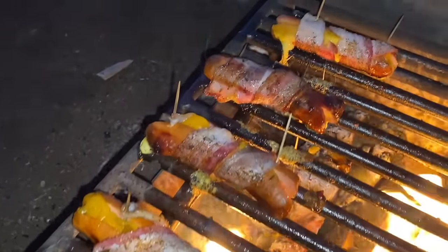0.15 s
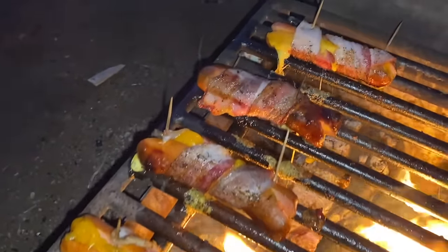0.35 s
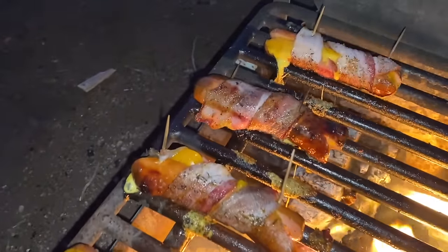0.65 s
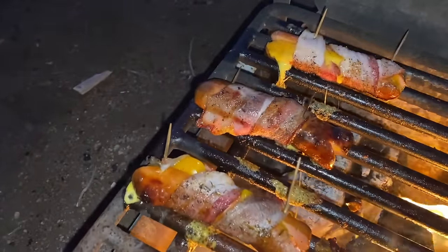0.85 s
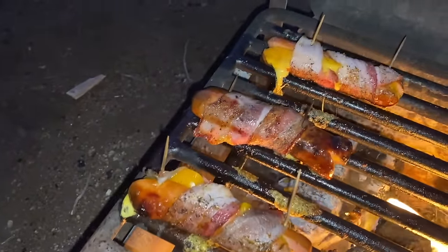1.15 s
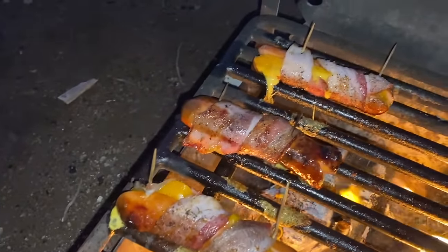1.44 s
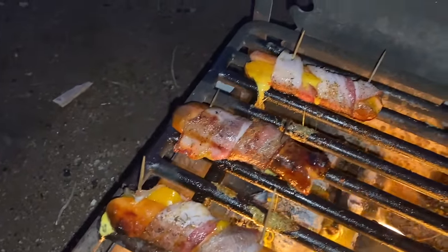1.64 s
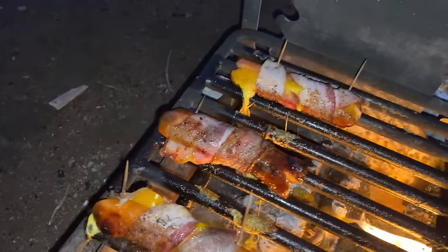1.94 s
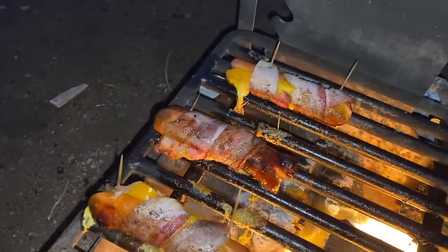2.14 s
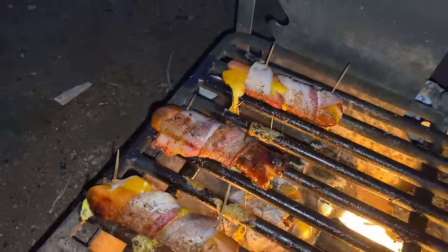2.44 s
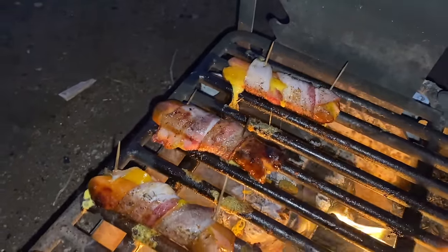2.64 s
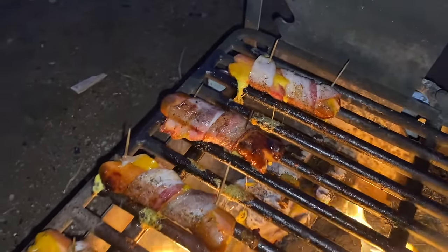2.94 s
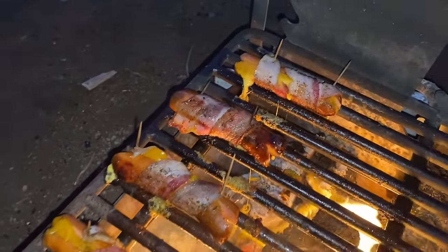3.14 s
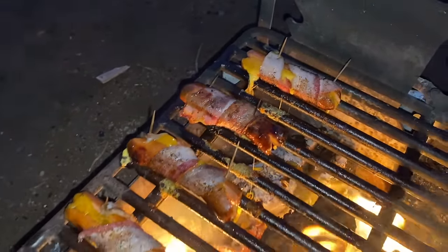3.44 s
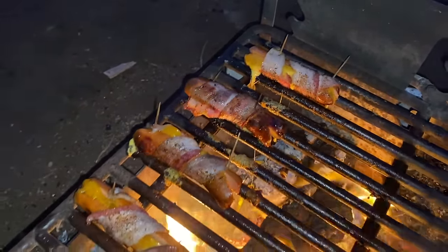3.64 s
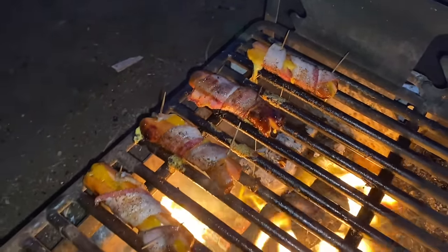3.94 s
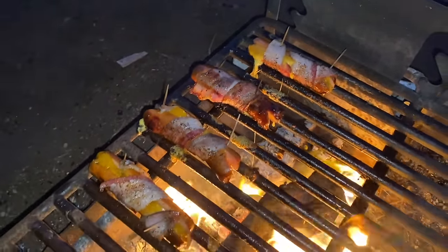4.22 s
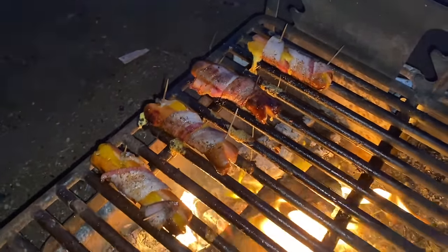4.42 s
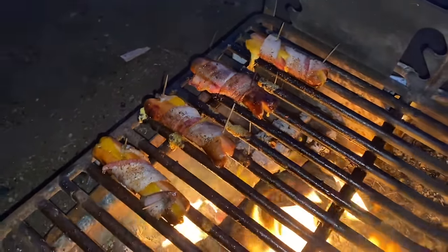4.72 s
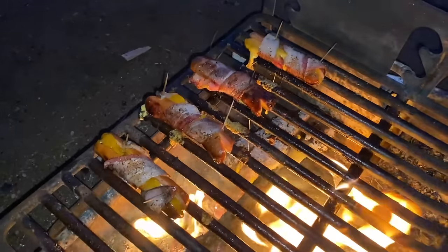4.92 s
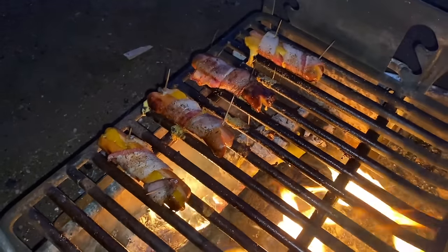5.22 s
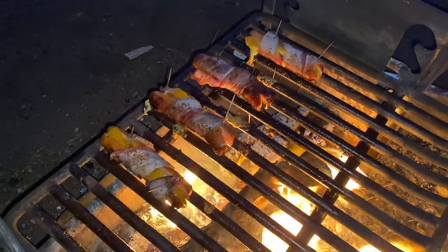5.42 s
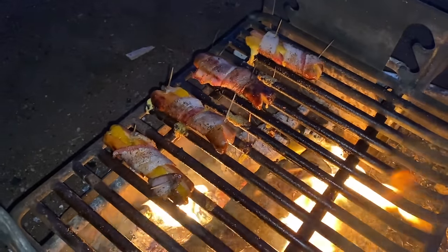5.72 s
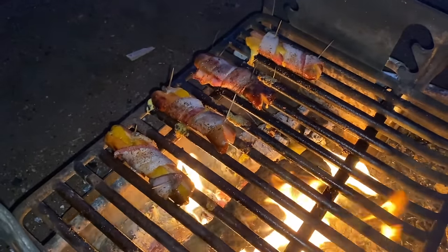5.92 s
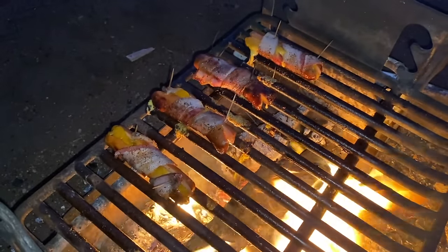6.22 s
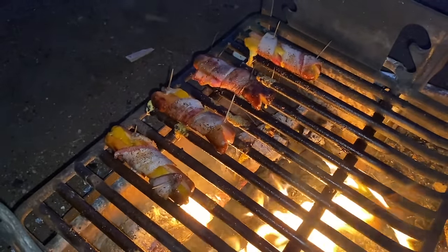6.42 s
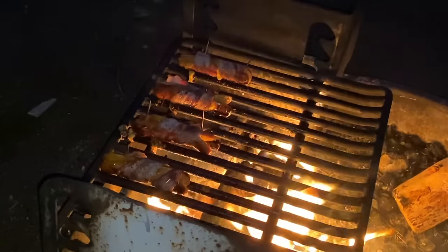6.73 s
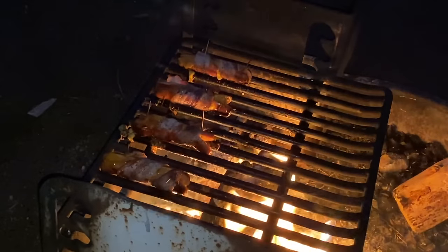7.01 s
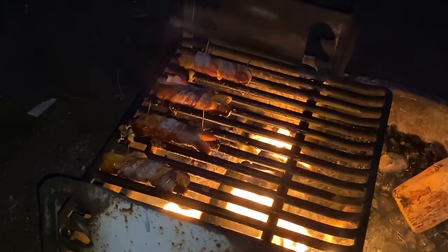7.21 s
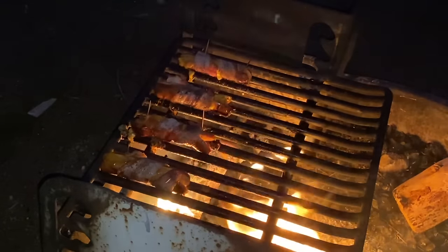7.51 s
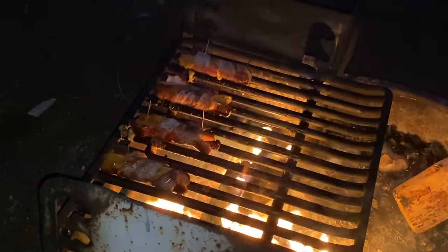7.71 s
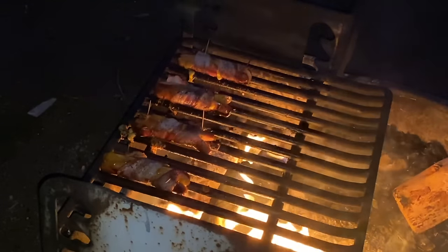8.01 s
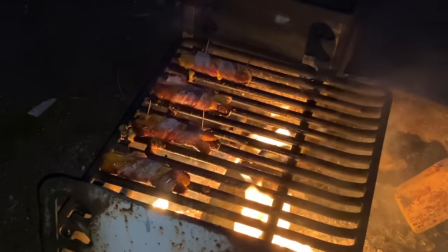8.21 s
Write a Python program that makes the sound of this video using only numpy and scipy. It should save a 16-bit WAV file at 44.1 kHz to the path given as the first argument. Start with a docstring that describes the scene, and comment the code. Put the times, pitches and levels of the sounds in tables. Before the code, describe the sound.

A close, hand-held microphone hears fat frying on a campfire grill: a continuous high fizz, many irregular crackling pops and the low, lumpy flutter of flames. Drips boil off on the embers in brief hisses, the strongest early on. A couple of soft knocks come in the second half. Then the level falls abruptly, and the sizzling and spitting continue with thin, faint whistles of steam.

```python
"""A dense sizzle with sharp spits over fluttering flames: bacon-wrapped sausages on a campfire grate. Bubbles
burst in the fat, drips flare on the embers and steam whistles through split skins. The low thumps are puffs of
flame and a couple of short knocks, one under a loud spit. All is heard through the two microphone ports of a
hand-held camera. It backs away midway, and near the end the level drops and the mids turn to the centre."""
import sys
import numpy as np
from scipy import signal
from scipy.fft import rfft, irfft, next_fast_len
from scipy.io import wavfile
from scipy.ndimage import uniform_filter1d, map_coordinates

SR = 44100
rng = np.random.default_rng(int(sys.argv[2]) if len(sys.argv) > 2 else 0)


def unload_audio(sound):
    """Save the sound as a 16-bit wav file, at the path given as the first command line argument."""
    columns = np.transpose(np.atleast_2d(sound))
    # keep every value between -1 and 1, then stretch to whole-number steps
    steps = np.round(np.clip(columns, -1, 1) * 32767)
    wavfile.write(sys.argv[1], SR, steps.astype(np.int16))


N = 368657

# How hard the fat fries. Each row: time in seconds, level in dB, offset of the two lower bands in dB.
SIZZLE_LEVELS = [(0, -42.5, 1.5), (.84, -39.5, 2), (1.05, -38.5, 1.5), (1.27, -37.5, 1), (1.6, -37.5, 2.5),
                 (1.8, -38, 1.5), (2.73, -40, 2.5), (3.55, -40, 1), (3.96, -42.5, 2), (4.2, -38.5, 1.5),
                 (4.45, -38.5, 1.5), (4.9, -41, 0.5), (5.39, -40, 1), (5.73, -42, 0.5), (6.15, -39.5, 0.5),
                 (6.64, -42.5, 0), (6.67, -42, -2.5), (6.95, -39, -1), (7.2, -42, -1.5), (7.65, -42, -2),
                 (8, -37.5, -3.5), (8.36, -38, -2.5)]
# Sizzle spectra, the lower two near and far. Each row: frequency in Hz, gain in dB.
HIGH_FIZZ = [(3500, -27), (5500, -11), (5900, -6.5), (6350, 0), (7500, 1.5), (9000, -1.5), (13000, 4),
             (15650, 1)]
MID_FIZZ_NEAR = [(2500, -17), (3800, -3), (4100, 0), (4350, 4), (4700, 3), (5050, 2), (5400, -3),
                 (5800, -6.5), (8000, -40)]
MID_FIZZ_FAR = [(2800, -20.5), (3900, -6), (4300, 0.5), (4600, 0), (4900, 1.5), (5400, -0.5), (5900, -4.5),
                (8000, -18.5)]
LOW_FIZZ_NEAR = [(900, -10.5), (1700, -6.5), (2600, 0), (3200, 1.5), (3800, -0.5), (5000, -15.5)]
LOW_FIZZ_FAR = [(900, -28), (1900, -13.5), (2300, -6.5), (2800, -0.5), (3100, -1), (3450, 1.5), (3800, -4),
                (5000, -27)]
MID_FIZZ_DB, LOW_FIZZ_DB = -9, -13  # against the high band

# Flame size. Each row: time in seconds, level in dB, offset of the upper flutter in dB.
BLAZE_LEVELS = [(0, -38.5, -9.5), (.2, -42, -2), (.65, -37.5, -3.5), (.9, -42, 1.5), (1.2, -40, -3),
                (1.5, -37.5, -3), (1.6, -39.5, 0), (1.8, -37.5, -5), (2, -38.5, -2), (2.4, -37.5, -2.5),
                (2.8, -38, -3), (3.2, -41.5, -0.5), (3.47, -41, -2.5), (3.65, -38.5, -3.5),
                (3.8, -38, -4.5), (4.05, -38.5, -6), (4.26, -40.5, -3.5), (4.6, -40.5, -3), (5.1, -41, -3),
                (5.5, -41.5, -6.5), (5.8, -41, -1.5), (5.95, -38.5, -5), (6.29, -43.5, -3.5),
                (6.5, -39.5, -2), (6.63, -43, -6.5), (6.8, -41, -0.5), (7.3, -40, -3.5), (7.8, -42, -1.5),
                (8.2, -40, -3.5), (8.36, -36, -8)]
# Swell of the roar. Each row: time in seconds, gain in dB.
ROAR_SWELL = [(0, 1), (1.5, -2), (3, 0.5), (4.5, 0), (6.6, -1.5), (6.75, -0.5), (7.05, 2.5), (7.3, -2),
              (7.8, -0.5), (8.1, -3), (8.36, 2)]
# Flame spectra, the roar before and after the change near the end. Each row: frequency in Hz, gain in dB.
LOW_FLUTTER = [(15, -18), (30, -29), (45, 1), (65, 4.5), (110, 0), (150, -11.5), (250, -44)]
UPPER_FLUTTER = [(80, -15.5), (140, 2.5), (200, -0.5), (270, -7.5), (400, -16), (600, -22.5), (1200, -37)]
ROAR_CLOSE = [(200, 6.5), (450, -2), (750, -4.5), (870, 1), (980, 3), (1150, 0), (1400, -2), (1900, -3),
              (2400, -30), (4000, -26)]
ROAR_WIDE = [(200, -0.5), (450, 0), (700, -11), (1000, -6.5), (1400, -6.5), (1900, -2.5), (2400, -11),
             (4000, -30)]
LOW_FLUTTER_DB, ROAR_DB, ROAR_DB_PER_BLAZE_DB = 0.5, -56, 0.38
STIR_S, STIR_DB = 0.0288, 3.5

# Loud spits of fat. Each row: start in seconds, then energy in dB in five bands, low to high.
LOUD_SPITS = [(0.103, -45, -32.0, -17, -20.0, -20), (0.3976, -40.0, -23, -25, -13, -24.0),
              (0.47, -37.0, -25, -22, -22, -22.0), (0.5442, -39, -38.0, -29, -14, -16.0),
              (0.5937, -28, -19, -35, -23, -22), (0.6932, -37.0, -38.0, -29, -16, -23.0),
              (0.7436, -28, -30, -28, -10, -16.0), (0.9112, -40.0, -36.0, -23, -16, -16),
              (0.948, -25, -17, -27.0, -17, -20.0), (1.1115, -27, -20, -23, -28, -27.5),
              (1.185, -34.0, -26, -21, -26, -21), (1.3357, -12, -16, -8, -8, -13.0),
              (1.3451, -30, -11, -14, -12, -6), (1.4812, -39, -25, -15, -12, -10.0),
              (1.6192, -39, -36.0, -29, -18, -13.0), (1.6357, -35, -35.0, -29.0, -19.5, -18),
              (1.6629, -38.0, -34.0, -26, -21, -10), (1.692, -29.0, -13.5, -18.0, -19, -21.0),
              (1.697, -17, -13, -9, -13, -10.0), (1.7895, -37, -16, -21, -20, -24.0),
              (1.836, -40.0, -21, -20, -24, -18.0), (1.865, -29, -29.0, -37.5, -21, -18.0),
              (1.904, -23, -16, -16, -20, -19.0), (1.9513, -35, -23, -32, -25, -23.0),
              (1.959, -21.5, -14, -27, -11, -11.0), (1.9823, -39, -27, -22, -15, -12.0),
              (2.0434, -46, -29, -20, -17, -13.0), (2.061, -38, -24.0, -20.0, -12, -9.0),
              (2.107, -26, -25, -16, -21, -33.0), (2.1897, -25, -17, -26, -14, -21.0),
              (2.3767, -31, -24, -19, -11.5, -17.0), (2.4617, -28, -25.0, -24.0, -20.0, -30),
              (2.5138, -32, -17, -20, -20, -15.0), (2.534, -35, -18, -10, -12, -6),
              (2.567, -27, -25, -29, -20, -16.0), (2.5716, -41.0, -30.0, -33.0, -17.0, -20.0),
              (2.6914, -24, -16, -23, -22, -27.0), (2.7066, -40, -28.0, -24, -11, -15.0),
              (2.814, -32, -21.0, -18, -16, -14.0), (2.878, -29, -25, -15, -8.0, -10.0),
              (2.889, -26, -26, -18.0, -5.5, -3), (2.8932, -36, -25, -17.0, -16, -13.0),
              (2.901, -37, -36.0, -21.0, -12, -34.0), (2.9827, -23, -23.0, -31, -21.0, -34),
              (3.0195, -26, -25.0, -26, -25, -37.0), (3.0713, -29, -26.0, -19.5, -19, -20.0),
              (3.079, -24, -20, -25.0, -21, -27.0), (3.0985, -43, -31, -25.0, -16.0, -17.0),
              (3.105, -16.5, -17, -17, -15, -15.0), (3.1387, -21, -19, -23.0, -29, -36.0),
              (3.1745, -40.0, -30, -29.0, -29, -22), (3.2163, -25, -17, -33, -35.0, -36.0),
              (3.2495, -40.0, -37.0, -38.0, -22, -17), (3.306, -37, -15, -23.0, -15, -26.0),
              (3.4413, -26, -19, -19, -16, -20), (3.4662, -25, -19, -18, -17.0, -22),
              (3.6135, -24, -22, -14.5, -12, -21), (3.6493, -37.0, -35, -19, -19, -24),
              (3.6698, -42.0, -31, -25.0, -22, -18.0), (3.6855, -41.0, -27.0, -19, -21, -22.0),
              (3.7019, -24, -18, -19, -18, -20.0), (3.71, -32, -26.0, -18, -12, -20.0),
              (3.7834, -34, -35, -35, -23, -21.0), (4.0161, -22, -15, -22, -11.0, -11),
              (4.0208, -35.0, -20, -32.0, -20.0, -14), (4.0622, -29, -16, -28, -14, -12),
              (4.07, -28, -21, -28, -24, -21), (4.151, -14, -8, -25, -11, -30.0),
              (4.2229, -31, -21, -27.0, -21, -10), (4.2877, -20, -14, -22, -14, -20.0),
              (4.3321, -39.0, -38, -37, -20, -16.0), (4.3495, -35, -17, -33, -10.5, -11.0),
              (4.418, -22, -19, -30.0, -24, -27.0), (4.457, -31, -24, -28, -15, -13),
              (4.5561, -35, -36, -29, -16, -14), (4.6093, -40, -33.0, -25, -18.0, -23),
              (4.6144, -37, -33, -22.0, -16, -26.0), (4.686, -24, -15, -23.0, -16.0, -22.0),
              (4.705, -12, -5.5, -15, -7, -20), (4.714, -37, -27.0, -27, -16, -19.0),
              (4.9048, -44.0, -27.0, -24, -14, -22.0), (5.151, -33, -17, -23.0, -20, -14),
              (5.219, -31, -30.0, -26, -18, -26), (5.2996, -26, -23, -24, -12, -17),
              (5.3993, -31, -14, -28, -20, -14.0), (5.421, -40, -29, -17, -12.0, -17.0),
              (5.602, -34, -20, -17, -14, -21), (5.625, -38.0, -24, -13, -11.5, -15),
              (5.7636, -29, -25, -30, -21, -29), (5.7793, -33, -21, -14.0, -17, -27),
              (5.7839, -44.0, -36, -25, -19, -29.0), (5.9266, -43, -30.5, -26, -15, -25.0),
              (5.9432, -44, -37, -27.0, -18.0, -20), (5.95, -42.0, -38.0, -30, -17, -24.0),
              (5.9677, -42.0, -32.0, -28, -17.0, -21.0), (6.0582, -30.0, -17, -27.0, -22, -19.0),
              (6.0698, -30, -25.0, -22.0, -12, -15), (6.1162, -43.0, -32, -20, -11.5, -20.0),
              (6.1783, -36.0, -27, -25.0, -15, -20.0), (6.2075, -43.0, -32, -23.0, -12.0, -23),
              (6.2381, -35, -32.0, -30, -19.0, -22.0), (6.253, -22, -12, -11.0, -5, -13),
              (6.572, -36, -23, -14.5, -14, -20), (6.6248, -29, -25, -21, -13, -19),
              (6.6336, -44, -29, -23, -18, -25.0), (6.695, -36, -29, -30, -26, -27),
              (6.7199, -27, -24, -21, -22, -21), (6.7321, -35, -35.0, -26.0, -23, -20.0),
              (6.774, -37, -26, -17, -16, -10.0), (6.808, -20, -21, -24, -24, -26),
              (6.865, -37, -27, -17, -18, -25), (6.9626, -21, -19, -18, -20, -24.0),
              (6.981, -27, -24, -25, -26, -27), (7.056, -31, -19, -21, -26, -26),
              (7.0867, -54, -28.0, -17, -21, -22.0), (7.1661, -46, -29, -16, -22, -18),
              (7.1731, -44.0, -34, -18, -19.0, -21.0), (7.1761, -27, -24.0, -21.0, -15.0, -16.0),
              (7.351, -33, -29, -21.0, -21, -24), (7.366, -35, -27.0, -23, -22.0, -19),
              (7.413, -31, -29.0, -20, -19, -22.0), (7.4588, -29, -24, -21, -18, -22.0),
              (7.5295, -38.0, -22, -20, -20.0, -24), (7.708, -45.0, -43.0, -25.0, -19, -13),
              (7.8942, -36, -32.0, -18, -16.0, -18), (7.9464, -35.0, -24.0, -19, -19.0, -19.0),
              (7.9913, -36, -37.0, -23, -19, -22), (7.9954, -35, -36.0, -20, -18, -21.0),
              (8.0096, -22, -15.0, -14.0, -18, -15), (8.0188, -35, -21, -19, -16, -21),
              (8.0966, -29, -17, -20, -16, -17), (8.2175, -23, -26, -32, -14, -20),
              (8.2765, -32.0, -22.0, -16, -21, -19), (8.289, -40.0, -26.0, -19.0, -21, -19)]
# The six edges of those bands.
SPIT_EDGES_HZ = [650, 3500, 6500, 9000, 13200, 16000]
# Relative energy of a small spit in each band, before its tilt.
SMALL_SPIT_BANDS_DB = [2, 2, -11, 5, -8]
# Colour of the fire pit's hollows. Each row: frequency in Hz, gain in dB.
PIT_COLOUR = [(650, -6), (1600, -6.5), (2300, -2.5), (3000, 3), (3800, -5), (4500, 1), (5200, 0),
              (6000, -1.5), (16000, -5)]
SNAP_DB, SNAP_T60_S = -3.5, 0.0016
BARS_DB, BARS_DELAY_S, BARS_T60_S = -18.5, 0.0014, 0.015

# Low thumps: puffs of flame and two short knocks, at 4.7 s (under a loud spit of fat) and 6.52 s.
# Each row: start in seconds, gain in dB, final pitch in Hz, decay length in cycles.
THUMPS = [(0.156, -25, 185, 2), (0.177, -23.5, 177, 1.8), (0.207, -27, 81, 1.7), (0.289, -33.5, 212.0, 2.1),
          (0.362, -34, 185, 3.1), (0.369, -22, 89.0, 1.3), (0.392, -27, 203, 2.2), (0.487, -28, 94.0, 1),
          (0.535, -34, 202, 2.2), (0.538, -21, 64, 1.5), (0.636, -29, 92, 2.2), (0.639, -29.5, 204, 2.4),
          (0.687, -26, 225, 1.6), (0.775, -24.5, 177, 1.6), (0.784, -22, 88.5, 1.5),
          (0.812, -28, 197.0, 1.1), (0.82, -26, 85.0, 1.1), (0.854, -31, 205, 4.4), (0.855, -33, 78.0, 5),
          (0.894, -27, 250, 2.5), (0.92, -24, 182.0, 1.5), (0.928, -18, 84.0, 1.2), (0.942, -30, 172, 2.7),
          (0.968, -22.5, 92.0, 1.9), (1.02, -29.5, 226, 3.3), (1.027, -34, 85.0, 0.67),
          (1.068, -42, 179.0, 2.8), (1.085, -28, 96, 2), (1.116, -36, 259.0, 1.5), (1.162, -29, 212.0, 2.1),
          (1.167, -20.5, 93.5, 2.1), (1.217, -30, 200, 2.3), (1.28, -30, 223.0, 1.8),
          (1.346, -34, 284, 3.7), (1.367, -27, 77.0, 0.7), (1.375, -38, 238.0, 0.97),
          (1.416, -32, 183.0, 1.8), (1.472, -25.5, 183, 2.6), (1.5, -20, 67.4, 1.5),
          (1.517, -26, 286.0, 1.2), (1.538, -31.0, 216.0, 1.4), (1.557, -26, 266, 2.3),
          (1.563, -16, 79.0, 1.1), (1.585, -25.5, 233.0, 1.2), (1.614, -25, 89.0, 1.2),
          (1.632, -24, 225, 1.4), (1.665, -27, 66.7, 1.0), (1.747, -25, 204, 0.9), (1.75, -34, 81, 1.7),
          (1.817, -33, 75.4, 1.1), (1.984, -29, 240.0, 1.4), (2.007, -23.5, 218, 1.6),
          (2.019, -29, 79.5, 1.9), (2.081, -40, 210.0, 0.85), (2.146, -26, 228, 1.6), (2.18, -28, 79, 1.25),
          (2.248, -29, 230.0, 2.2), (2.26, -27, 99.0, 1.6), (2.368, -25.5, 77.6, 2.2),
          (2.371, -37, 167, 3.1), (2.415, -28, 210, 1.9), (2.467, -34, 186.0, 2.8), (2.517, -33, 201, 2.6),
          (2.54, -17, 95.0, 1.1), (2.54, -25.5, 232, 4.3), (2.557, -36, 194.0, 1.7),
          (2.587, -33, 210.0, 1.7), (2.622, -25.5, 202, 2.3), (2.622, -27, 88.6, 0.9),
          (2.641, -31, 213.0, 1.2), (2.75, -26, 97.0, 1.1), (2.749, -24, 180, 1.6),
          (2.778, -29.0, 226.0, 0.91), (2.794, -19.5, 86.5, 1.25), (2.826, -22, 253, 1.15),
          (2.844, -18.5, 81.5, 1.4), (2.85, -27, 211.0, 0.98), (2.942, -23.0, 95, 1.9),
          (2.947, -25.5, 204, 2.1), (2.967, -31, 183, 2.1), (2.983, -23, 83.0, 0.96),
          (3.131, -25.5, 90, 1.4), (3.149, -28, 220.0, 1.5), (3.194, -25, 92, 1.2), (3.203, -39, 192, 1.9),
          (3.228, -27, 182, 2.3), (3.246, -33, 87.4, 2.8), (3.248, -41, 218, 2.4), (3.284, -34, 212, 2.3),
          (3.397, -29, 217, 2.8), (3.402, -21, 94.0, 1.2), (3.487, -34, 190, 2.6), (3.506, -28, 86.0, 0.86),
          (3.543, -28.0, 93, 1.4), (3.591, -31, 230, 1.2), (3.592, -27.5, 84.0, 1.5), (3.698, -26, 95, 1.7),
          (3.715, -23, 239.0, 1.3), (3.784, -27, 87, 1.5), (3.816, -25, 212, 2), (3.849, -31, 222.0, 1.4),
          (3.857, -27, 98, 1.2), (3.928, -24, 78.0, 0.84), (3.961, -34.5, 209, 2.8),
          (3.973, -30, 76.0, 0.82), (4.027, -37, 89.0, 0.9), (4.028, -29, 219, 2.5),
          (4.192, -29, 88.0, 1.2), (4.226, -26.5, 71.5, 1.5), (4.279, -32, 193, 1.9),
          (4.323, -31, 170, 2.2), (4.333, -27, 81.6, 1.26), (4.43, -24, 74.0, 1.2), (4.509, -27, 85, 1.1),
          (4.598, -33, 180.0, 2.4), (4.611, -32.5, 61.0, 2.1), (4.62, -30, 199, 1.9),
          (4.663, -33, 90.0, 1.6), (4.7045, -37, 650, 1.2), (4.877, -28, 171, 2.4), (4.918, -22, 82.5, 1.7),
          (5.009, -30, 180, 2.2), (5.016, -23.5, 74.0, 1.3), (5.049, -28.5, 234, 2),
          (5.092, -32.5, 200, 3.9), (5.095, -28, 78, 1.1), (5.374, -27, 92, 2.1), (5.858, -25, 74.0, 1.1),
          (5.903, -36, 203, 2.2), (5.91, -19.5, 76.0, 0.86), (5.924, -33, 196, 2.2),
          (6.24, -24.5, 85, 1.04), (6.319, -27, 198, 2.3), (6.335, -23, 76.4, 1.3),
          (6.497, -30.5, 89.5, 1.9), (6.52, -23, 420, 2.1), (6.527, -32, 300, 1.4), (6.529, -27, 69.6, 2.7),
          (6.556, -32, 370, 2.7), (6.617, -21, 85, 1.4), (6.742, -26, 252, 1.5), (6.795, -23.5, 243, 1.6),
          (6.816, -20, 188, 1.2), (6.835, -32, 184.0, 1.3), (6.881, -26, 210, 1.2),
          (7.029, -23, 236.0, 2.1), (7.03, -22, 96.0, 1.8), (7.05, -24, 284.0, 1.0),
          (7.072, -25, 208.0, 1.6), (7.14, -28.5, 229.0, 1.8), (7.315, -32, 78.6, 1.4),
          (7.397, -25.5, 82.0, 0.91), (7.609, -22.5, 68.4, 1.4), (7.739, -25, 78.5, 0.79),
          (7.915, -21, 75.0, 1.1), (7.987, -27.5, 190, 2.2), (8.005, -24, 77.0, 1.0),
          (8.043, -31, 82.0, 1.0), (8.139, -24, 95.0, 0.82), (8.179, -25, 212, 2.3), (8.184, -23, 67, 2.5),
          (8.24, -34, 216.0, 2.9), (8.242, -26, 78.0, 1.2), (8.299, -32, 86.0, 1.1)]

# Drips on the embers. Each row: start in seconds, level in dB, rise in seconds, T60 in seconds,
# time until dry in seconds, treble gain in dB.
DRIPS = [(1.274, -26.5, 0.041, 1.36, 0.28, -0.5), (3.968, -34, 0.013, 1.46, .5, 3.5),
         (8.185, -36, 0.021, 0.6, .3, 1)]
# Flare spectra, near and far. Each row: frequency in Hz, gain in dB.
FLARE_NEAR = [(900, -30), (1400, -11), (2100, -4), (2750, 2.5), (3500, -6), (4250, 7), (4700, 2), (5050, 2),
              (5500, 1), (6400, 5.5), (7000, -4), (9000, -2), (13500, 0), (15650, -1.5)]
FLARE_FAR = [(900, -43), (1900, -12), (2600, 2.5), (3200, 3.5), (3900, -3), (4500, 1.5), (5100, 5.5),
             (6500, -1), (9000, -3), (13500, 3.5), (15650, -6)]

# Steam jets. Each row: start in seconds, length in seconds, level in dB, pitch in Hz.
WHISTLES = [(6.86, .19, -58, 3340), (6.9, .12, -64, 1860), (7.17, .09, -61, 3300), (7.9, .26, -58, 5450)]

# Port response, before and after the change near the end. Each row: frequency in Hz, likeness from 0 to 1, left
# minus right in dB, right's phase lead in radians. ports() applies about 0.8 of the balance and of any lead.
PORTS_CLOSE = [(60, 0.98, 0.5, 0.043), (295, 0.93, 1, 0.28), (630, 1, -4, -1.14), (1280, 0.25, 5.5, -0.97),
               (2800, 0.47, 5, 0.045), (4330, 0.1, 3, 0.59), (5430, 0, 1.5, 1), (6540, 0.3, 0, -0.36),
               (8600, 1, 0, 0.056)]
PORTS_WIDE = [(60, 1, 0, -0.094), (300, 0.94, 0, 0), (705, 0.7, 0, 0.18), (1360, 0.88, 0, -0.24),
              (2470, 1, 0, 0.13), (7000, 1, 0, -0.093)]
BARE_PORTS_HZ, TOP_HZ = 6880, 15850
BACK_AWAY_S = (3.3, 3.84)
PORTS_CHANGE_S, PORTS_CHANGE_DROP_DB = 6.655, 9


def amp(db):
    """Gain of a level in dB."""
    return 10 ** (np.asarray(db) / 20)


def unit(x):
    """x at rms 1."""
    return x / np.sqrt(np.mean(x ** 2) + 1e-20)


def along(rows, hz):
    """Each column after the frequency, interpolated on a log axis."""
    knots_hz, *columns = np.transpose(rows)
    return [np.interp(np.log(hz + 1), np.log(knots_hz + 1), column) for column in columns]


def curves(rows):
    """Each column after the time, interpolated per sample."""
    knots_s, *columns = np.transpose(rows)
    return [np.interp(np.arange(N) / SR, knots_s, column) for column in columns]


def noise():
    """Two independent white noises."""
    return rng.standard_normal((2, N))


def wobble(knots_per_s):
    """A smooth random curve."""
    return map_coordinates(rng.standard_normal(N // 100 + 4), [np.arange(N) * knots_per_s / SR])


def filtered(x, response):
    """x through a frequency response."""
    size = next_fast_len(x.shape[-1] + 8192)
    return irfft(rfft(x, size) * response(np.fft.rfftfreq(size, 1 / SR)), size)[..., :x.shape[-1]]


def coloured(x, spectrum):
    """x shaped by a spectrum, at rms 1."""
    return unit(filtered(x, lambda hz: amp(along(spectrum, hz)[0])))


def patchy(x, depth_db):
    """x with random louder and softer patches in time and frequency."""
    spectra = signal.stft(x, nperseg=512)[2]
    patches = uniform_filter1d(rng.standard_normal(spectra.shape[1:]), size=5, axis=0)
    patches = uniform_filter1d(patches, size=6, axis=1)
    return signal.istft(spectra * amp(depth_db * unit(patches)), nperseg=512)[1][:, :N]


def bubbles(spread_db, t60_s, count):
    """Bubbles burst at random, few of them big: two noises on one spiky envelope."""
    moment, luck = rng.random((count, 2)).T
    size = amp(spread_db * np.minimum(-np.log(luck), 2.5))
    bursts = np.bincount((moment * N).astype(int), size, N)
    envelope = signal.fftconvolve(bursts, amp(-60 * np.arange(256) / SR / t60_s))[:N]
    return unit(envelope * noise())


def sizzle():
    """Frying fat: a hiss of steam with small, middling and big bubbles in three bands."""
    level_db, lower_db = curves(SIZZLE_LEVELS)
    shared = bubbles(spread_db=4.5, t60_s=0.0039, count=1500)
    surge = wobble(20)
    high = noise() + 0.5 * shared + 0.42 * bubbles(spread_db=9, t60_s=0.0044, count=6000)
    mid = noise() + 0.53 * shared + 0.52 * bubbles(spread_db=7.5, t60_s=0.0028, count=5000)
    low = noise() + 0.41 * shared + 0.67 * bubbles(spread_db=5, t60_s=0.007, count=2500)
    high = coloured(high, HIGH_FIZZ)
    # A changing echo path shifts the two lower humps upwards with distance.
    far = np.interp(np.arange(N) / SR, BACK_AWAY_S, [0, 1])
    mid = (1 - far) * coloured(mid, MID_FIZZ_NEAR) + far * coloured(mid, MID_FIZZ_FAR)
    low = (1 - far) * coloured(low, LOW_FIZZ_NEAR) + far * coloured(low, LOW_FIZZ_FAR)
    high *= amp(level_db + 1.02 * surge + 0.8 * wobble(45))
    mid *= amp(level_db + lower_db + MID_FIZZ_DB + 0.5 * surge + 0.52 * wobble(45))
    low *= amp(level_db + lower_db + LOW_FIZZ_DB + 0.21 * surge + 0.47 * wobble(45))
    return patchy(high + mid + low, depth_db=1.2)


def flames(low_thumps):
    """Turbulent burning: lumpy low flutter, faster upper flutter, faint roar; calmer between thumps."""
    blaze_db, upper_db = curves(BLAZE_LEVELS)
    thump_rms = np.sqrt(np.abs(uniform_filter1d(low_thumps[0] ** 2, int(STIR_S * SR))))
    stir = np.tanh(unit(thump_rms))
    blaze_db += STIR_DB * (stir - stir.mean() - 0.2)
    lump, lick = wobble(30), 2 * wobble(9.9)
    low = coloured(noise(), LOW_FLUTTER) * amp(0.47 * lump + lick)
    upper = coloured(noise(), UPPER_FLUTTER) * amp(1.6 * lump + 1.3 * lick + 2.26 * wobble(55))
    flutter = amp(LOW_FLUTTER_DB) * unit(low) + amp(upper_db) * unit(upper)
    roar = noise()
    roar = np.where(np.arange(N) < PORTS_CHANGE_S * SR, coloured(roar, ROAR_CLOSE), coloured(roar, ROAR_WIDE))
    swell_db = curves(ROAR_SWELL)[0] + ROAR_DB_PER_BLAZE_DB * (blaze_db - blaze_db.mean())
    roar *= amp(ROAR_DB + swell_db + 1.5 * lump)
    return amp(blaze_db) * flutter + roar


def small_spits(count, loudest_db=-21, range_db=17):
    """Weaker spits of random time and brightness, as rows like LOUD_SPITS."""
    moment, weakness = rng.random((count, 2)).T
    tilt_db_per_octave = 3.4 + 2.6 * rng.standard_normal((count, 1))
    octave = np.log2(np.array(SPIT_EDGES_HZ[1:]) + SPIT_EDGES_HZ[:-1])
    scatter_db = 3 * rng.standard_normal((count, len(octave)))
    bands_db = SMALL_SPIT_BANDS_DB + tilt_db_per_octave * octave - scatter_db
    bands_db -= 20 * np.log10(np.linalg.norm(amp(bands_db), axis=1, keepdims=True))
    energy_db = loudest_db - range_db * np.sqrt(weakness)
    return np.column_stack([moment * N / SR, bands_db + energy_db[:, None]])


def spits():
    """Fat spits: a sharp click with a snap of noise behind it, answered weakly by the grate bars."""
    out, t = np.zeros((2, N + 1024)), np.arange(-64, 448) / SR
    age_s, hz = np.maximum(t, 0), np.fft.rfftfreq(len(t), 1 / SR)
    snap = (t > 0) * amp(SNAP_DB - 60 * age_s / SNAP_T60_S)
    bars = (t > BARS_DELAY_S) * amp(BARS_DB - 60 * age_s / BARS_T60_S)
    lowpasses = [1 / (1 + (hz / edge_hz) ** 16) for edge_hz in SPIT_EDGES_HZ]
    bandpasses = np.diff(lowpasses, axis=0)[:, None] * amp(along(PIT_COLOUR, hz)[0])
    for start_s, *energy_db in [*small_spits(count=40), *LOUD_SPITS]:
        tail = (snap + bars) * rng.standard_normal((2, len(t)))
        click = (t == 0) * rng.choice([-1, 1], size=(2, 1))
        bands = irfft(rfft(click + tail) * bandpasses)
        bands *= amp(energy_db)[:, None, None] / np.linalg.norm(bands, axis=2, keepdims=True)
        out[:, round(start_s * SR):][:, :len(t)] += bands.sum(axis=0)
    return out[:, 64:N + 64]


def thumps(rise_cycles=0.49, glide_s=0.00063):
    """Puffs of flame and short knocks: each a few cycles that start with a fast fall in pitch."""
    out, t = np.zeros((2, N + 4096)), np.arange(4096) / SR
    for start_s, gain_db, pitch_hz, decay_cycles in THUMPS:
        cycles = pitch_hz * (t + 0.002162 * (1 - np.exp(-t / glide_s)))
        swell = np.exp(-(cycles / decay_cycles) ** 2) * (1 - np.exp(-pitch_hz * t / rise_cycles))
        tone = np.sin(2 * np.pi * (cycles + rng.random((2, 1))))
        out[:, round(start_s * SR):][:, :len(t)] += amp(gain_db) * swell * tone
    return out[:, :N]


def flares(dry_out_s=0.01):
    """A drip boils off on the embers: a sputtering hiss that swells, fades and stops once dry."""
    out = np.zeros((2, N))
    for start_s, level_db, rise_s, t60_s, dry_s, treble_db in DRIPS:
        t = np.maximum(np.arange(N) / SR - start_s, 0)
        boil = noise() + 0.5 * bubbles(spread_db=12, t60_s=0.0071, count=6000)
        boil = coloured(boil, FLARE_NEAR if start_s < BACK_AWAY_S[0] else FLARE_FAR)
        boil = filtered(boil, lambda hz: amp(along([(4000, 0), (9000, treble_db)], hz)[0]))
        swell = 1 - np.exp(-(t / rise_s) ** 2)
        wet = (1 - np.tanh((t - dry_s) / dry_out_s)) / 2
        sputter_db = wobble(60)
        out += amp(level_db - 60 * t / t60_s + sputter_db) * swell * wet * boil
    return out


def whistles(half_width_hz=110):
    """Steam escapes a split skin: a narrow, breathy band of noise that swells and fades."""
    out, t = np.zeros((2, N)), np.arange(N) / SR
    for start_s, length_s, level_db, pitch_hz in WHISTLES:
        breath = filtered(noise(), lambda hz: np.exp(-((hz - pitch_hz) / half_width_hz) ** 2))
        progress = np.clip((t - start_s) / length_s, 0, 1)
        out += amp(level_db) * np.sqrt(np.abs(np.sin(np.pi * progress))) * unit(breath)
    return out


def ports(pair, table):
    """Left and right ports: pair[0] is common to both, pair[1] enters with opposite signs."""
    def response(hz, side):
        likeness, balance_db, lead_rad = along(table, hz)
        mix_rad = np.arccos(np.clip(likeness, 0, 0.96 + 0.03 * (hz < BARE_PORTS_HZ))) / 2
        # In the treble the bare ports are heard: the right one gets the grate sooner.
        lead_rad += 2 * np.pi * 0.0003 * np.maximum(hz - BARE_PORTS_HZ, 0)
        gain = amp(side * balance_db / 2) * np.exp(-0.5j * side * lead_rad)
        return gain * [np.cos(mix_rad), side * np.sin(mix_rad)]
    return np.array([filtered(pair, lambda hz: response(hz, side)).sum(axis=0) for side in (0.78, -0.81)])


def scene():
    """All sources through the ports, first one way and then, quieter, another."""
    low_thumps = thumps()
    pair = sizzle() + flares() + whistles() + spits() + flames(low_thumps) + low_thumps
    close = ports(pair, PORTS_CLOSE)
    wide = amp(-PORTS_CHANGE_DROP_DB) * ports(pair, PORTS_WIDE)
    return np.where(np.arange(N) < PORTS_CHANGE_S * SR, close, wide)


def record(dry):
    """The camera passes nothing above its band limit."""
    return filtered(dry, lambda hz: hz < TOP_HZ)


dry = scene()
out = record(dry)
unload_audio(out)
```